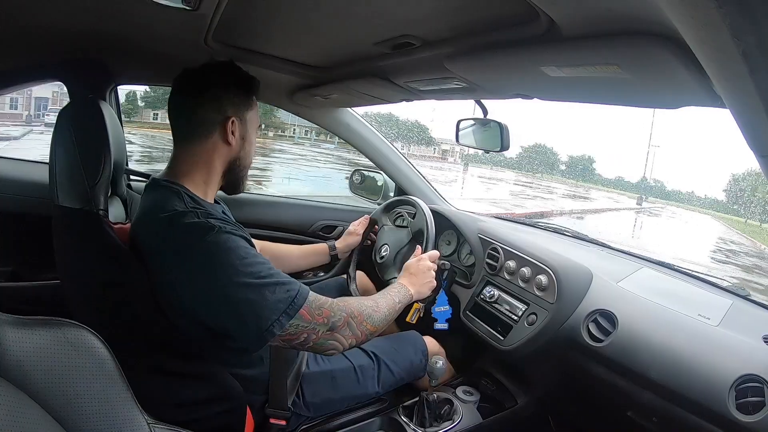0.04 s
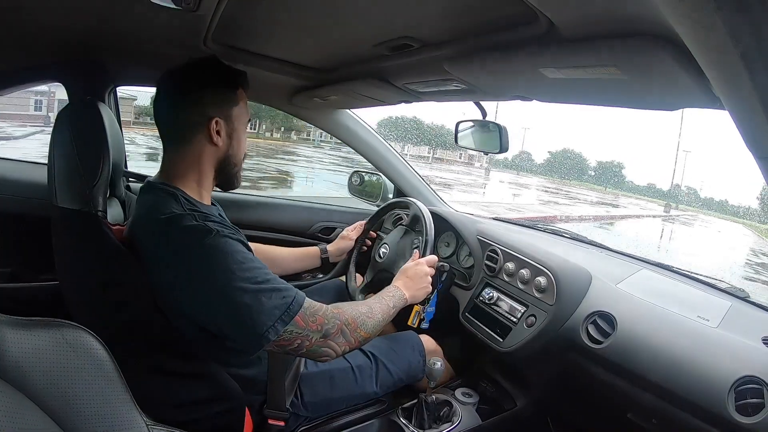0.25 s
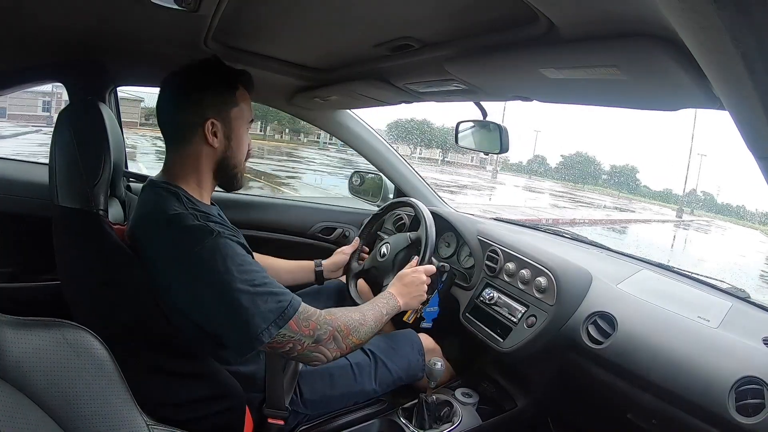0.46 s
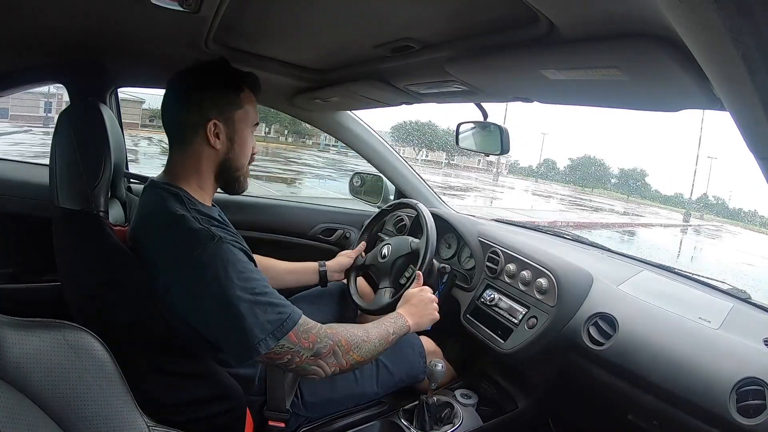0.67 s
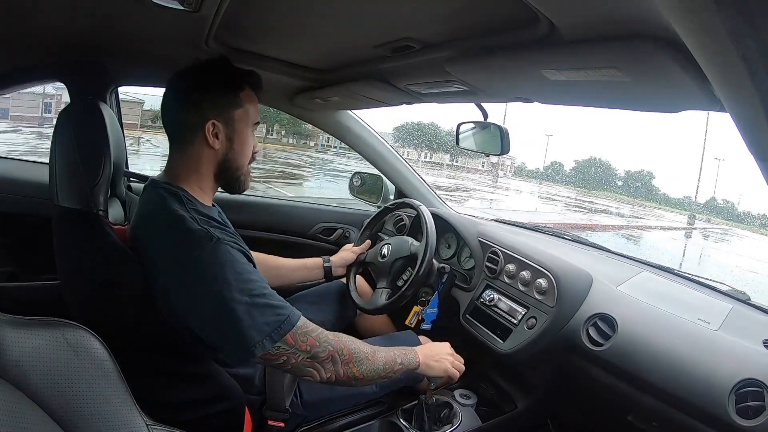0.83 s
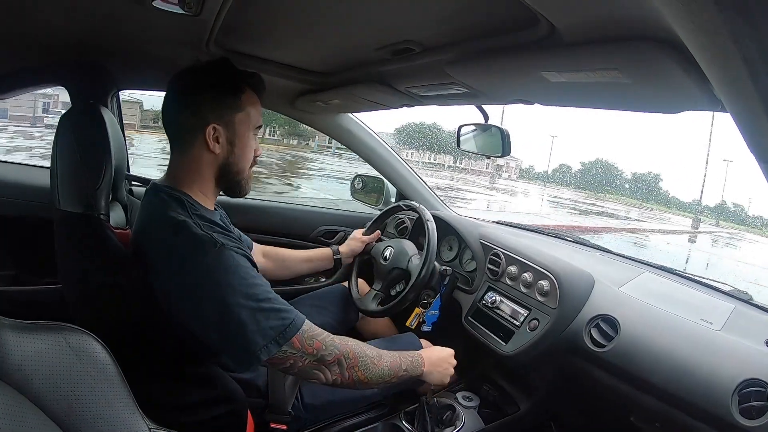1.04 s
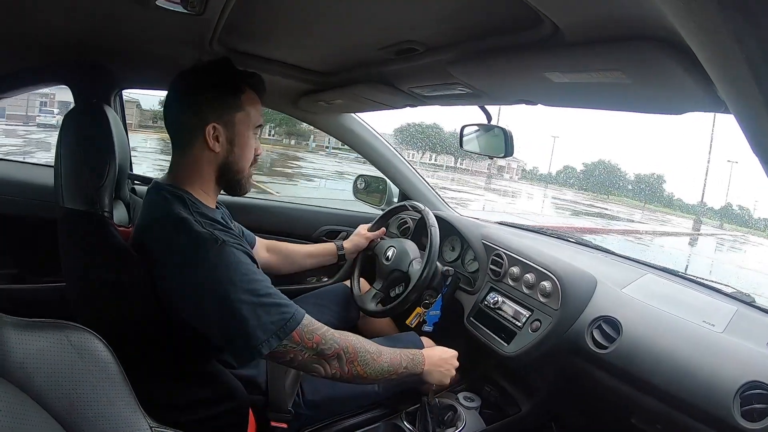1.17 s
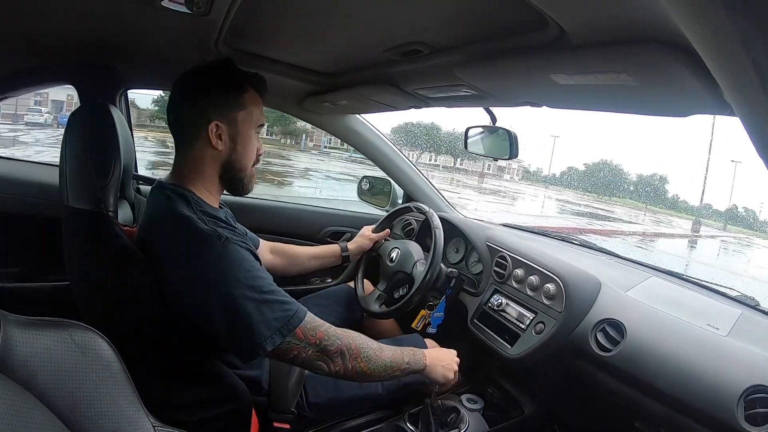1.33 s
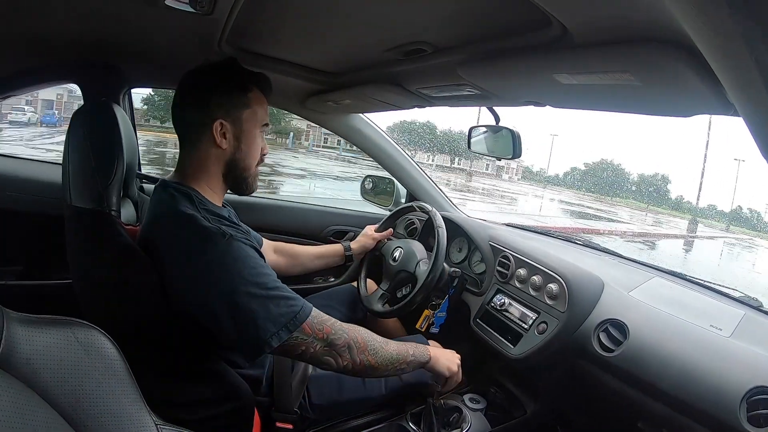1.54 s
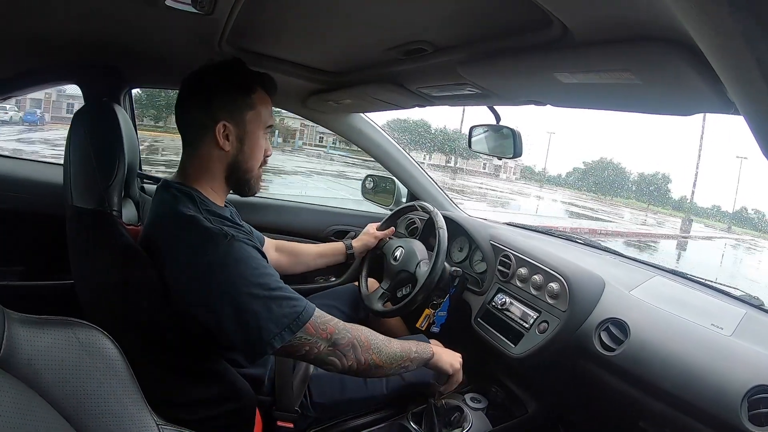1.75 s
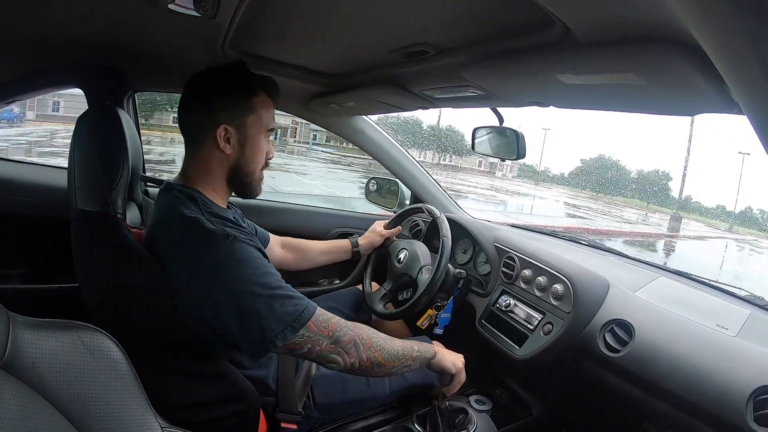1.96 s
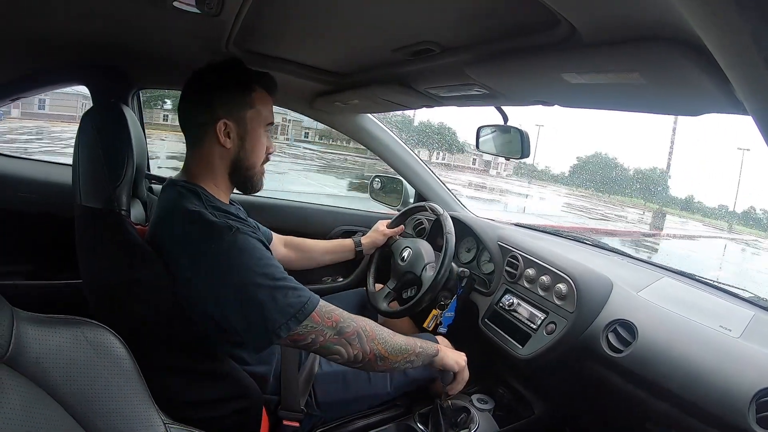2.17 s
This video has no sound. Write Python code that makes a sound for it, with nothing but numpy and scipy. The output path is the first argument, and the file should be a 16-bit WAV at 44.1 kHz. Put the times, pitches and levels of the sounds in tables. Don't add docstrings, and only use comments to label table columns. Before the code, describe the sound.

Inside a car cabin, a brief dull hum and click, then a four-cylinder engine pulls upward in one smooth rise, booming and increasingly raspy, over tyre rumble, early water spray and soft bump thumps; small close microphone.

```python
import sys
import numpy as np
from scipy import signal
from scipy.io import wavfile
from scipy.ndimage import uniform_filter1d

SR = 44100
rng = np.random.default_rng(int(sys.argv[2]) if len(sys.argv) > 2 else 0)


def gain_from_db(level_db):
    decades = np.asarray(level_db, float) / 20
    return 10 ** decades


def file_out(sig):
    cols = np.atleast_2d(sig).T
    lim = np.clip(cols, -1, 1)
    pcm = np.round(lim * 32767).astype(np.int16)
    wavfile.write(sys.argv[1], SR, pcm)


N = 97108
CUT_S = .03862
REF_HZ = 170
FLICKER_DB = .8

# frequency in Hz, level in dB.
EARLIER_TONES = [(64, -24.5), (107, -24), (231, -43.5), (294, -43)]
# frequency in Hz, density in dB per Hz.
ROAD_SPECTRUM = [(20, -1), (70, -2), (200, -7.5), (380, -8.5), (600, -24), (2200, -36.5), (4500, -56.5),
                 (13000, -89.5)]
# frequency in Hz, side over mid in dB.
ROAD_WIDTH = [(25, -15), (100, -22), (200, -18.5), (400, -13.5), (600, 6), (3000, -4), (9000, 17)]
# frequency in Hz, left over right in dB.
ROAD_BALANCE = [(25, 3), (250, 0.5), (1000, -3), (4000, 1.5), (8000, 4)]
# centre in Hz, width in Hz, level in dB.
BODY_MODES = [(27.2, 24, -33), (51.3, 32, -41.5), (94.7, 23, -42)]
# centre in Hz, width in Hz, level in dB.
RASP_MODES = [(970, 1100, -49), (2040, 450, -55), (2427, 360, -62), (3590, 500, -66.5), (5750, 2800, -65.5)]
# centre in Hz, width in Hz, level in dB.
SPRAY_MODES = [(4930, 1200, -66), (6200, 1800, -63.5), (9800, 2400, -69.5), (13200, 3000, -72)]
# time in seconds, level in dB.
SPRAY_FADE = [(.04, 1.5), (.12, 7), (.33, 3.5), (.45, -3.5), (.55, -1), (.65, -7), (1.2, -14.5),
              (2.2, -8.5)]
# start in seconds, peak in dB, ring time in seconds.
TRIM_TICKS = [
    (0.017, -43, 0.0033),
    (0.19, -49.5, 0.0094),
    (0.259, -49, .008),
    (.434, -53.5, 0.0051),
    (0.502, -57.5, .004),
    (0.6, -56.5, 0.0042),
    (.934, -56, 0.0032),
    (1.0, -42, 0.003),
    (1.005, -51, 0.015),
    (1.379, -54.5, .002),
]
# centre in Hz, width in Hz, level in dB.
TRIM_MODES = [(2200, 530, -5), (3600, 2000, 4), (6030, 1300, 2), (9500, 3000, -11)]
# start in seconds, length in seconds, frequency in Hz, level in dB.
KEY_SHIVERS = [
    (2.095, .1, 12200, -73),
    (2.13, .06, 10700, -75),
    (2.125, .04, 13150, -80),
    (2.17, .04, 13800, -80),
    (2.18, .03, 10000, -71),
]
# centre in seconds, length in seconds, frequency in Hz, level in dB.
ROAD_BUMPS = [
    (.36, .2, 26.9, -23.5),
    (0.658, .25, 32, -25.5),
    (1.032, .14, 33, -21),
    (1.17, .14, 28, -20.5),
    (1.75, 0.11, 26, -24.5),
    (2.051, .14, 24, -27),
    (0.145, 0.11, 48, -24.5),
    (1.576, .12, 109.7, -23.5),
    (2.021, .1, 91.82, -26.5),
    (2.14, 0.19, 87, -24),
]
# time in seconds, firing rate in Hz, then levels in dB of the firing boom,
# its second multiple, the three-quarter order and the one-and-a-half order.
RUN_UP = [(0.04, 111, -18.5, -30, -43.3, -50), (0.15, 114.3, -19.5, -53, -47, -68),
          (0.3, 120.3, -23, -41, -29, -56), (0.45, 128.3, -20, -37.5, -27.5, -37),
          (0.58, 137.2, -13.5, -29, -26, -39.5), (0.69, 143.3, -20.5, -32, -42.5, -27.5),
          (0.8, 150.1, -11.5, -38.5, -34, -40), (0.95, 161.6, -10.5, -24.5, -45.5, -53.5),
          (1.06, 168.8, -13, -20.5, -27, -43), (1.12, 172.2, -40, -29.5, -31, -42.5),
          (1.22, 181.7, -13, -28.5, -35.5, -50.5), (1.33, 188.1, -8.5, -26, -36, -47),
          (1.47, 198.6, -12, -22.5, -35, -43), (1.6, 209.6, -17.5, -28, -26, -22.5),
          (1.72, 220, -25, -31, -23, -27), (1.9, 236.6, -11, -33, -27, -25.5),
          (2.05, 247.3, -13, -33.5, -15.5, -37), (2.2, 257.6, -19, -38, -29, -34.5)]
# time in seconds, then levels in dB of the third multiple,
# the one-and-a-quarter order, the boom between the ports and the load.
LOAD_RUN = [(0.04, -39.5, -24, -45, -10), (0.15, -35, -41.0, -59, -15), (0.3, -40.5, -44, -59, -9.5),
            (0.45, -34.5, -38, -47.5, -7), (0.58, -33.5, -40.5, -57, -5), (0.69, -49, -37.5, -38, -2.5),
            (0.8, -50.5, -21, -34.5, -3), (0.95, -48.5, -31, -36.5, -2), (1.06, -43.5, -40.5, -33.5, -7),
            (1.12, -31.5, -47.5, -28.5, -7.5), (1.22, -59, -53, -26.5, -1.5),
            (1.33, -47.5, -44, -31.5, -5.5), (1.47, -40.5, -40, -36, -1.5), (1.6, -48, -53.5, -46, -2.5),
            (1.72, -42.5, -37, -61, 0.0), (1.9, -39, -32, -32, -1.5), (2.05, -40, -38, -33, 0.5),
            (2.2, -47.5, -28, -31.5, 0.5)]
# multiple of the firing rate, level in dB, growth in dB per octave of revs.
LOW_ORDERS = [(.5, -37.5, 9), (1.75, -43.5, 12), (2.25, -40.5, 15), (2.5, -33.5, -3.5), (2.75, -32.5, 4.5),
              (3.25, -37.5, 5.5), (3.5, -43, 13), (3.75, -39.5, 8.5), (4, -37, 8.5)]
# centre in Hz, width in Hz, level in dB, share differing between ports in dB.
CABIN_MODES = [(115, 100, -13, -23), (253, 24, 7.5, -11), (290.7, 36, 0.5, -14.5), (352, 62, 2, -24.5),
               (385, 17, -2.5, -24), (444, 74, -17, -6), (543.7, 23, 1.5, -10.5), (650.4, 24, -2.5, 5.5),
               (751.4, 19, -5, -2), (889, 45, -5, 3), (1142, 150, -10.5, -13), (1330, 200, -15.5, -4.5),
               (1920, 360, -23.5, 1), (2390, 220, -21.5, -12)]
# centre in Hz, width in Hz, level in dB.
SIDEWAYS_MODES = [(350, 40, -45.5), (450, 60, -45.5)]
# centre in seconds, length in seconds,
# multiple of the firing rate, level in dB, level between the ports in dB.
PANEL_BOOMS = [(.41, 0.25, 1.75, -35.5, -60), (0.557, .32, 2.5, -30.5, -51.5), (.45, .2, 2.75, -31.5, -60),
               (.62, .2, 4, -51.5, -53.5), (.68, .2, 5.25, -50, -53), (.75, 0.39, 6, -46, -45.5),
               (.76, 0.52, 2.75, -38.5, -62.5), (.83, 0.31, 2.25, -31.5, -52.5),
               (.88, 0.27, 1.75, -30.5, -58.5), (.91, 0.23, 2.5, -40, -50.5), (.95, .3, 4, -42, -50.5),
               (.97, 0.15, 9, -49.5, -52), (.98, .2, 5.75, -44, -44), (1.63, .35, 3.25, -47.5, -49.5),
               (.7, .25, 3.75, -43, -52.5), (1.03, 0.28, 4.25, -47, -47.5), (1.05, 0.38, 3.75, -50.5, -51),
               (1.25, .3, 4, -44, -51), (1.25, .35, 6.25, -54.5, -60.5), (1.3, .25, 5, -52.5, -56),
               (1.48, .38, 2.75, -33.5, -38.5), (1.5, .3, 5.5, -45.5, -58), (1.519, 0.24, 3.75, -39, -35),
               (1.601, .4, 4.25, -42.5, -42), (1.58, 0.48, 5.25, -52, -54), (1.6, 0.18, 2.5, -34.5, -42.5),
               (1.7, .2, 4.5, -43, -52), (1.75, 0.5, 1.75, -31.5, -59), (1.93, .22, 3.25, -46, -42.5),
               (1.94, 0.33, 6, -48, -49.5), (1.97, .5, 4, -48.5, -45), (1.98, .38, 2.25, -37, -40),
               (2.07, 0.26, 4.5, -46.5, -55), (2.07, 0.37, 3.5, -46.5, -50.5)]


def read(table, hz):
    return np.interp(np.log(hz), np.log(np.array(table)[:, 0]), np.array(table)[:, 1])


def band(x, hz, width):
    return signal.lfilter(*signal.iirpeak(hz, hz / width, SR), x)


def walk(rate):
    hold = int(SR / rate)
    steps = np.repeat(rng.standard_normal(N // hold + 1), hold)
    return 1.86 * uniform_filter1d(uniform_filter1d(steps, hold), hold)[:N]


def swell(t, centre, length):
    return np.cos(np.pi * np.clip((t - centre) / length, -.5, .5)) ** 2


def ports(mid, side, pan_db=0.):
    return np.array([(mid + side) * gain_from_db(pan_db / 2), (mid - side) * gain_from_db(-pan_db / 2)])


def hiss(hz, width):
    x = band(band(rng.standard_normal((2, N)), hz, width), hz, width)
    return x / x.std()


def earlier_engine(t):
    ago = 2 * np.pi * (CUT_S - t)
    mid = sum(np.sqrt(2) * gain_from_db(db) * np.sin(hz * ago) for hz, db in EARLIER_TONES)
    side = -gain_from_db(-23) * np.cos(70 * ago)
    return ports(mid, side)


def road(t):
    out, drift = 0, walk(2)
    for hz in 22 * 2 ** np.arange(0, 9.6, .5):
        mid, side = hiss(hz, hz / 2)
        bandwidth_db = 10 * np.log10(hz / 30)
        db = read(ROAD_SPECTRUM, hz) + bandwidth_db + 0.39 * drift + FLICKER_DB * walk(8)
        out = out + gain_from_db(db) * ports(mid, side * gain_from_db(read(ROAD_WIDTH, hz)), read(ROAD_BALANCE, hz))
    return out * gain_from_db(-31 + 2 * t) / out.std()


def body_shake():
    out = 0
    for hz, width, db in BODY_MODES:
        mid, side = hiss(hz, width)
        out = out + gain_from_db(db + 3.7 * walk(4.5)) * ports(mid, .3 * side, -1.2)
    return out


def spray(t):
    drops = gain_from_db(np.interp(t, *np.array(SPRAY_FADE).T) + .5 * FLICKER_DB * walk(21))
    out = 0
    for hz, width, db in SPRAY_MODES:
        mid, side = hiss(hz, width)
        out = out + gain_from_db(db + 2 * FLICKER_DB * walk(90)) * drops * ports(mid, .9 * side, -.4)
    return out


def rasp(t, hz, turn):
    steady, decay_cycles = .9, .95
    cam_hz, cam_db = 224, 4.5
    load = .6 * np.interp(t, *np.array(LOAD_RUN)[:, [0, 4]].T)
    throttle = 3.9 * swell(t, .48, .23)
    level = -6.5 * np.log2(hz / REF_HZ) + load + throttle + cam_db * np.tanh((hz - cam_hz) / 18)
    cycle = turn / (2 * np.pi) % 1
    puff = (steady + np.exp(-cycle / decay_cycles)) * gain_from_db(level)
    out = 0
    for centre, width, db in RASP_MODES:
        mid, side = hiss(centre, width)
        out = out + gain_from_db(db + FLICKER_DB * walk(4.9)) * puff * ports(mid, .55 * side, -5.0)
    return out


def microphone(noise):
    top_hz, leak_db = 10600, -16
    low = signal.butter(6, top_hz, fs=SR, output='sos')
    return gain_from_db(leak_db) * noise + signal.sosfiltfilt(low, noise)


def trim_ticks(t):
    out, noise = np.zeros((2, N)), rng.standard_normal((2, N))
    for start, db, ring in TRIM_TICKS:
        age = np.clip(t - start, 0, 1)
        envelope = (1 - np.exp(-age / 0.00014)) * np.exp(-age / ring)
        out += gain_from_db(db + 7) * envelope * ports(noise[0], .6 * noise[1], -2.7)
    return sum(gain_from_db(db) * band(band(band(out, hz, width), hz, 2 * width), hz, 3 * width)
               for hz, width, db in TRIM_MODES)


def cut_click(t, after):
    height, fade_s = .11, .0011
    step = height * after * np.exp(-np.abs(t - CUT_S) / fade_s)
    return ports(step, 0, 1.5)


def cabin(hz):
    mid = side = 0
    for k, (centre, width, db, side_db) in enumerate(CABIN_MODES):
        ring = gain_from_db(db) * (-1) ** k * width / (width + 2j * (hz - centre))
        mid = mid + ring
        side = side + ring * gain_from_db(side_db) * 1j ** k
    return mid, side


def strong_orders(t, hz, turn):
    rows, more = np.array(RUN_UP), np.array(LOAD_RUN)

    def size(table, column):
        return np.interp(t, table[:, 0], gain_from_db(table[:, column] / 2)) ** 2

    orders = [(1, size(rows, 2)), (2, size(rows, 3)), (.75, size(rows, 4)),
              (1.5, size(rows, 5)), (3, size(more, 1)), (1.25, size(more, 2))]
    mid = sum(level * np.sin(k * turn + 8 * np.pi * k ** 2) for k, level in orders)
    sideways = sum(gain_from_db(db) * w / (w + 2j * (2 * hz - f)) for f, w, db in SIDEWAYS_MODES)
    side = size(more, 3) * np.cos(turn) + np.abs(sideways) * np.cos(2 * turn)
    side += gain_from_db(-24.5) * sum(level * np.cos(k * turn) for k, level in orders[2:])
    return np.sqrt(2) * ports(mid, side)


def weak_orders(t, hz, turn):
    bed_db, blur_rad, wander_db, wander_per_s = -5, .12, 4, 10
    upper = []
    for quarter in range(17, 42):
        whole_db = 1 if quarter % 4 == 0 else 0
        upper.append((quarter / 4, -34.5 - 2 * np.log2(quarter / 16) + whole_db, 2))
    few, pick = slice(0, N, 128), np.arange(N) // 128
    octave = np.log2(hz[few] / REF_HZ)
    load = np.interp(t[few], *np.array(LOAD_RUN)[:, [0, 4]].T)
    out = np.zeros((2, N))
    for k, db, grow in LOW_ORDERS + upper:
        wander = np.interp(t[few], np.arange(24) / wander_per_s, rng.standard_normal(24))
        blur = blur_rad * np.sqrt(k) * uniform_filter1d(rng.standard_normal(len(octave)), 6).cumsum()
        phase = 2 * np.pi * rng.random() + blur
        gain = gain_from_db(db + bed_db + grow * octave + load + wander_db * wander) * np.exp(1j * phase)
        size = gain * np.array(cabin(k * hz[few]))
        real = uniform_filter1d(size.real[:, pick], 128)
        imag = uniform_filter1d(size.imag[:, pick], 128)
        out += real * np.cos(k * turn) - imag * np.sin(k * turn)
    return ports(out[0], gain_from_db(-4) * out[1], -0.76)


def bumps(t):
    out = np.zeros((2, N))
    for centre, length, hz, db in ROAD_BUMPS:
        thump = gain_from_db(db) * swell(t, centre, length) * np.sin(2 * np.pi * hz * (t - centre))
        out += ports(thump, -.15 * thump)
    return np.sqrt(2) * out


def panel_booms(t, turn):
    out = np.zeros((2, N))
    for centre, length, k, db, side_db in PANEL_BOOMS:
        on = np.abs(t - centre) < length / 2
        angle = k * turn[on] + 2 * np.pi * rng.random()
        tone = ports(gain_from_db(db) * np.sin(angle), gain_from_db(side_db) * np.cos(angle))
        out[:, on] += swell(t[on], centre, length) * tone
    return np.sqrt(2) * out


def shivering_keys(t):
    out = np.zeros((2, N))
    for start, length, hz, db in KEY_SHIVERS:
        envelope = np.sin(np.pi * np.clip((t - start) / length, 0, 1)) ** .7
        mid, side = hiss(hz, 350.)
        out += gain_from_db(db) * envelope * ports(mid, .4 * side, 3.5)
    return out


def scene():
    t = np.arange(N) / SR
    hz = np.interp(t, *np.array(RUN_UP)[:, :2].T) * (1 + 0.0015 * walk(20))
    turn = 2 * np.pi * np.cumsum(hz) / SR
    turn += np.pi / 2 - np.interp(CUT_S, t, turn)
    after = t > CUT_S
    noise = microphone(road(t) + body_shake() + spray(t) + rasp(t, hz, turn))
    engine = strong_orders(t, hz, turn) + weak_orders(t, hz, turn)
    mix = earlier_engine(t) * ~after + cut_click(t, after) + engine * after + noise
    return mix + trim_ticks(t) + bumps(t) + panel_booms(t, turn) + shivering_keys(t)


def band_limit(x):
    return signal.sosfilt(signal.butter(12, 15750, fs=SR, output="sos"), x)


def record(dry):
    mix = np.tanh(.6 * dry) / .6
    return band_limit(mix)


dry = scene()
out = record(dry)
file_out(out)
```